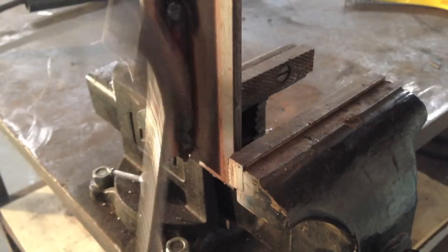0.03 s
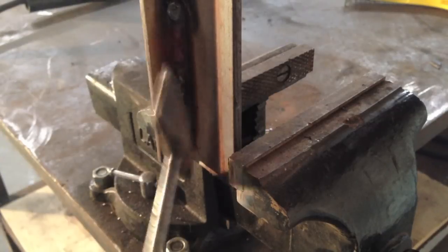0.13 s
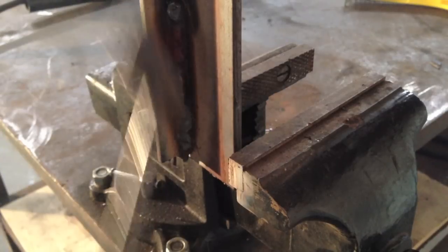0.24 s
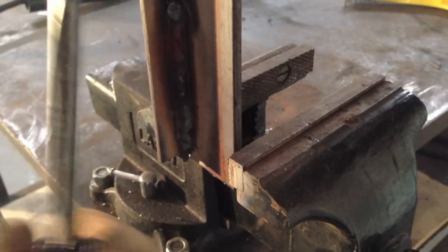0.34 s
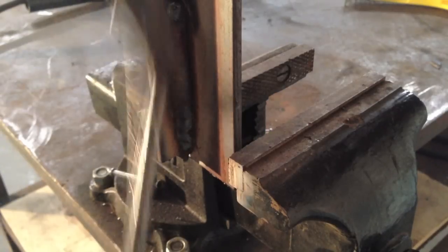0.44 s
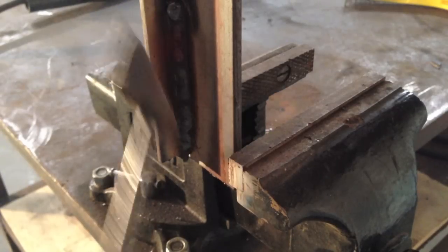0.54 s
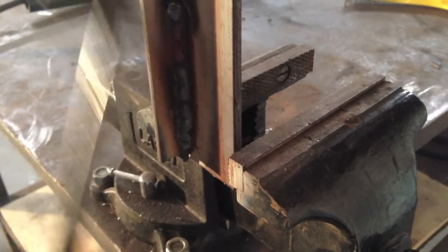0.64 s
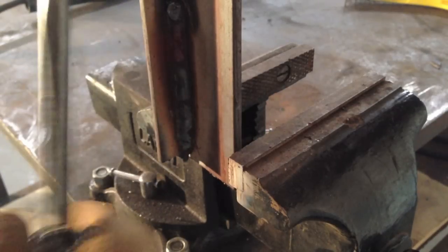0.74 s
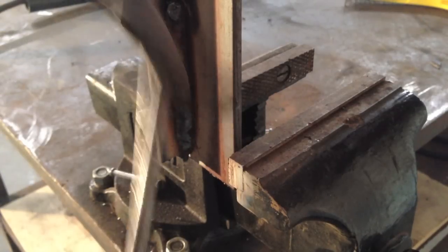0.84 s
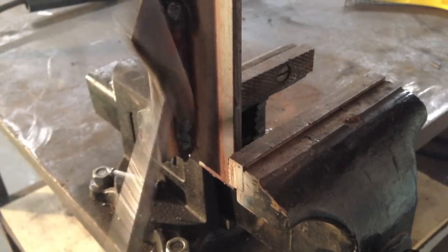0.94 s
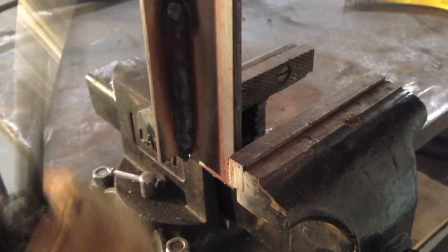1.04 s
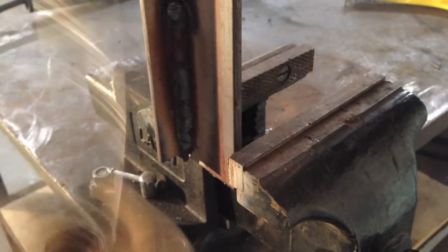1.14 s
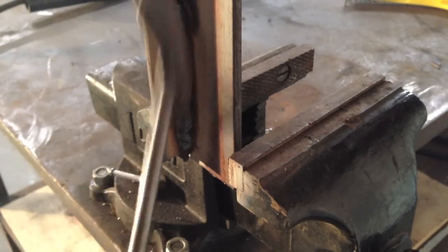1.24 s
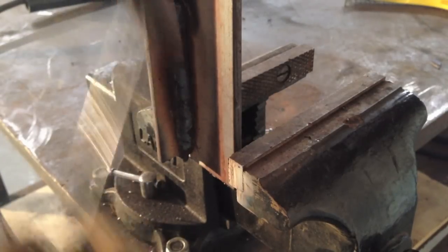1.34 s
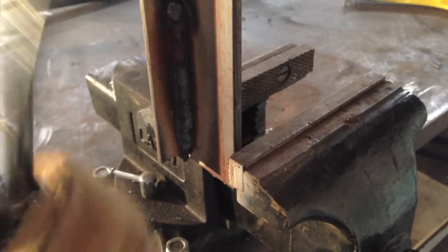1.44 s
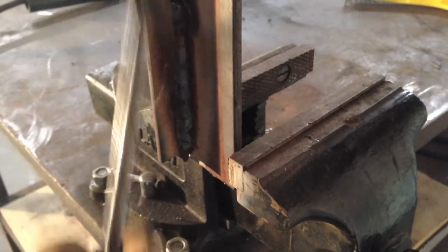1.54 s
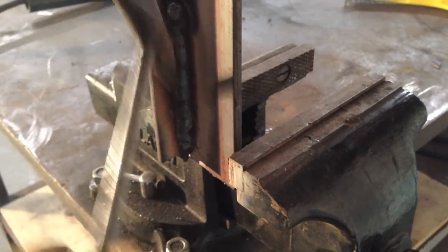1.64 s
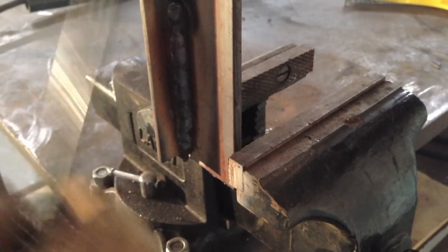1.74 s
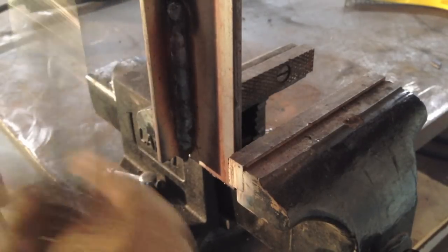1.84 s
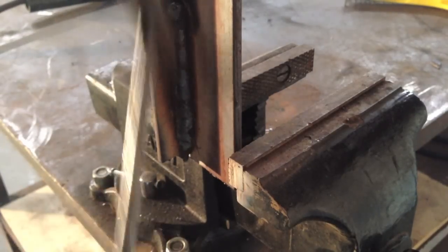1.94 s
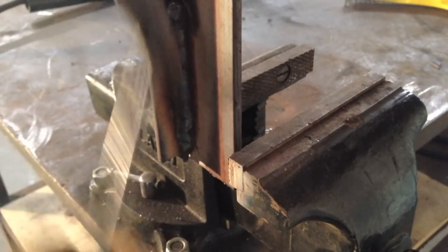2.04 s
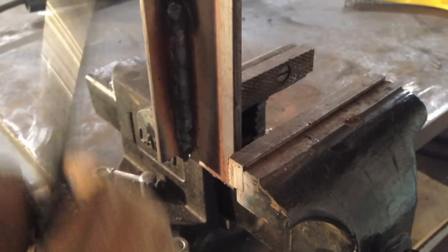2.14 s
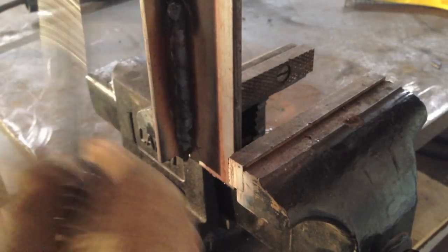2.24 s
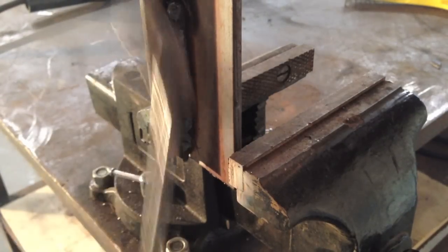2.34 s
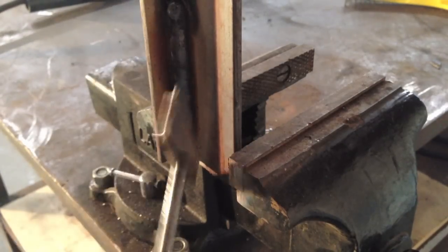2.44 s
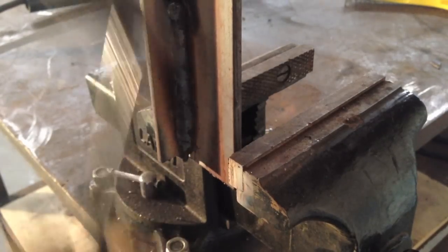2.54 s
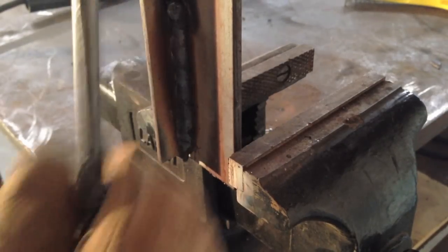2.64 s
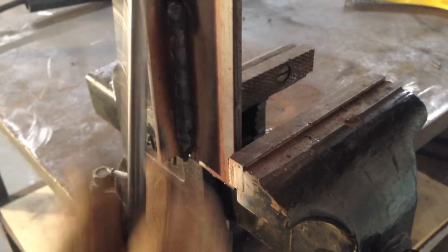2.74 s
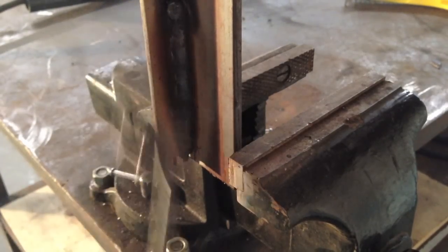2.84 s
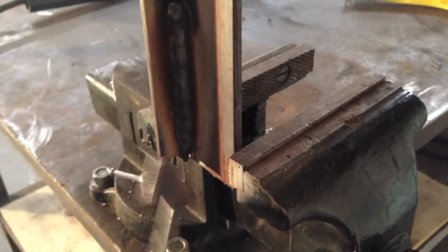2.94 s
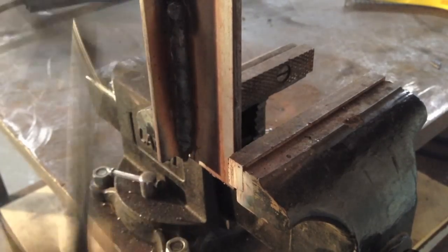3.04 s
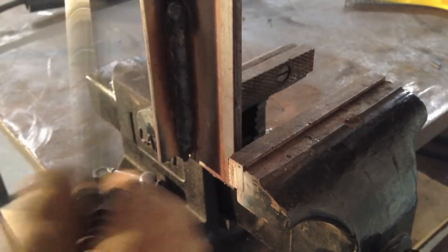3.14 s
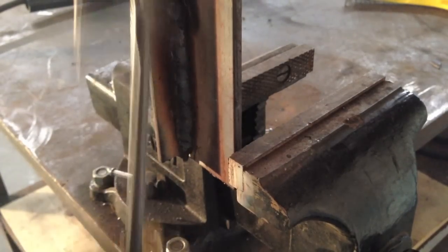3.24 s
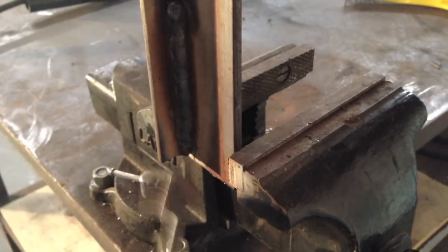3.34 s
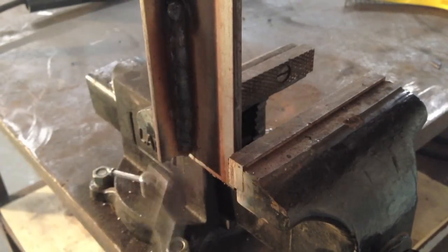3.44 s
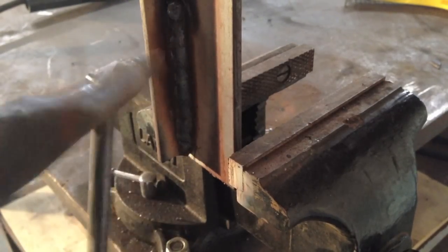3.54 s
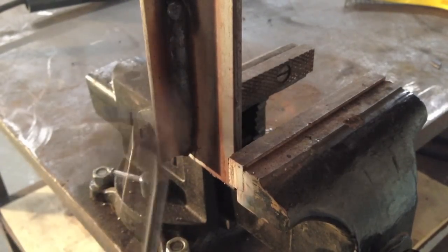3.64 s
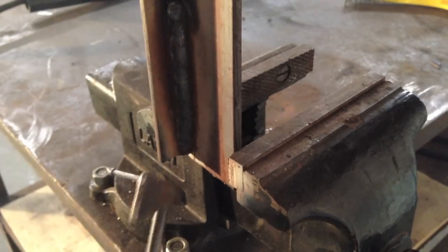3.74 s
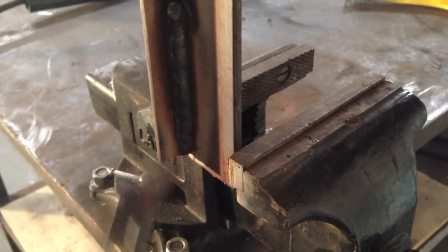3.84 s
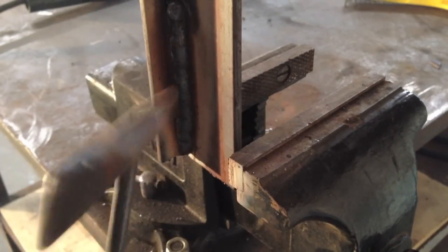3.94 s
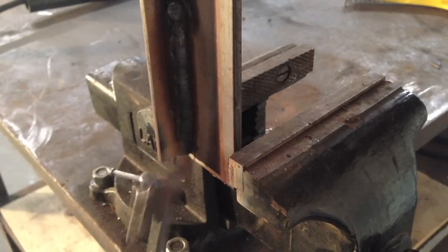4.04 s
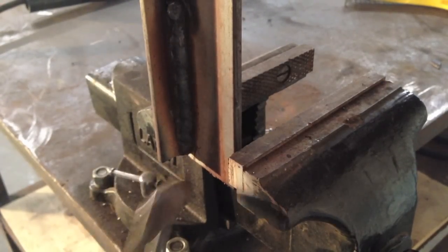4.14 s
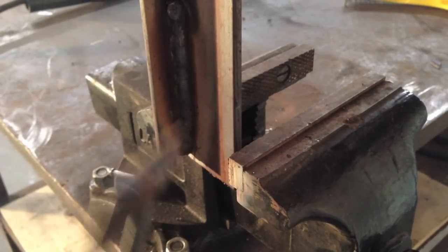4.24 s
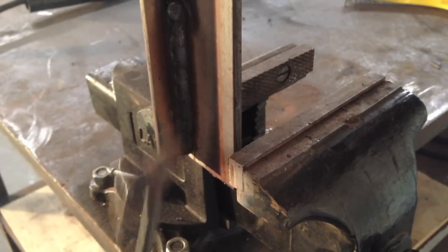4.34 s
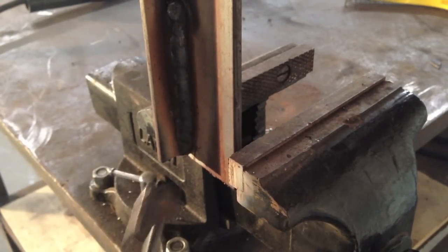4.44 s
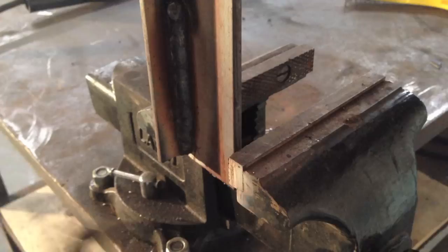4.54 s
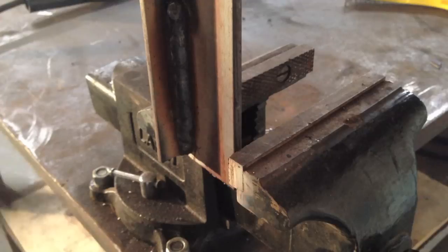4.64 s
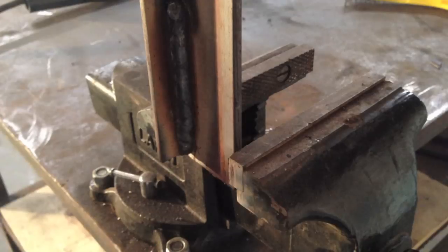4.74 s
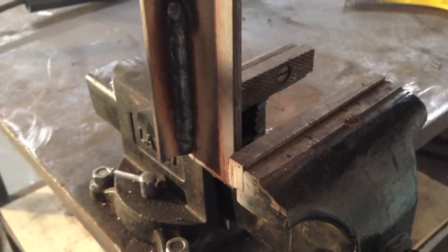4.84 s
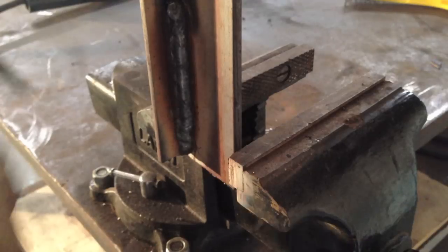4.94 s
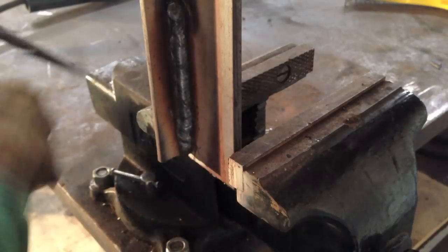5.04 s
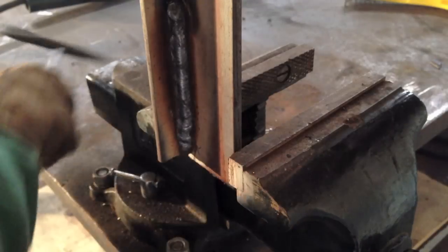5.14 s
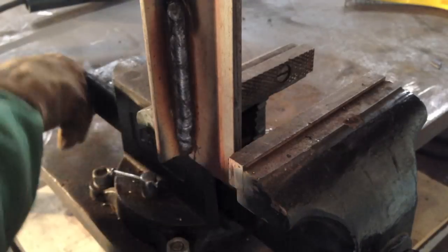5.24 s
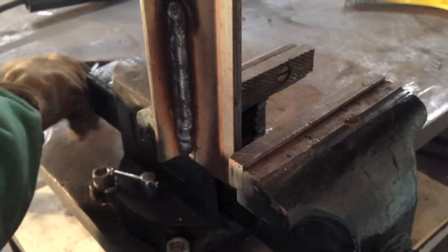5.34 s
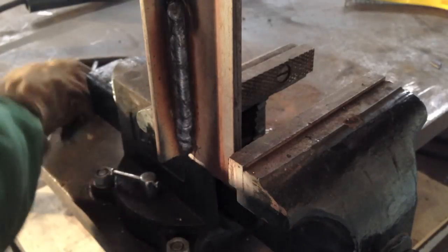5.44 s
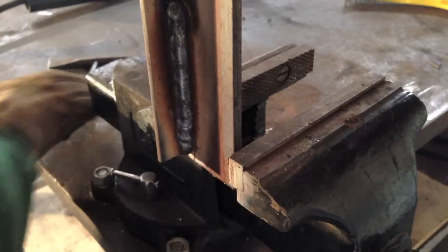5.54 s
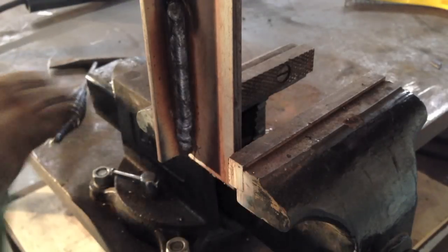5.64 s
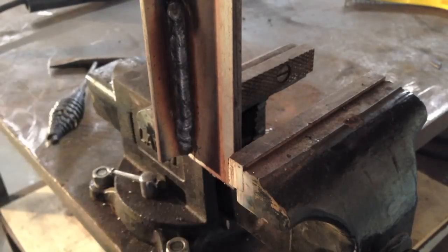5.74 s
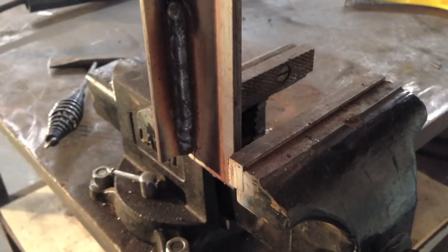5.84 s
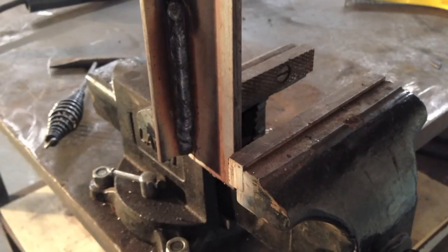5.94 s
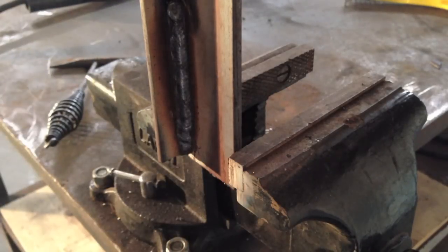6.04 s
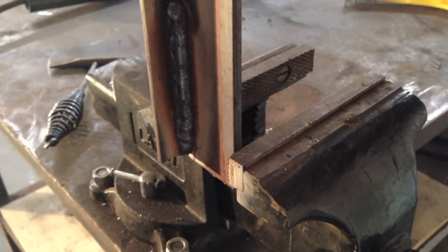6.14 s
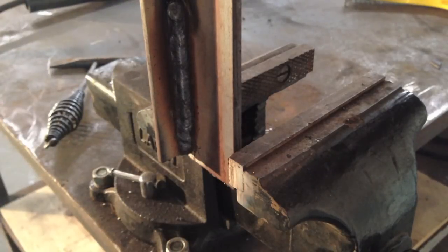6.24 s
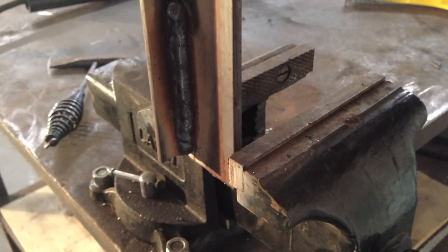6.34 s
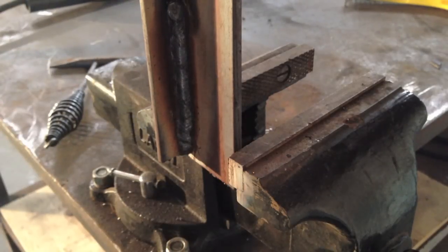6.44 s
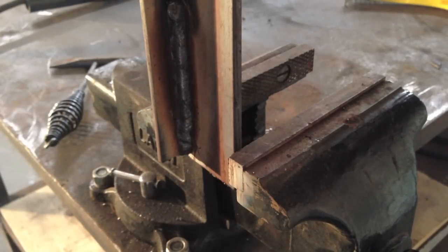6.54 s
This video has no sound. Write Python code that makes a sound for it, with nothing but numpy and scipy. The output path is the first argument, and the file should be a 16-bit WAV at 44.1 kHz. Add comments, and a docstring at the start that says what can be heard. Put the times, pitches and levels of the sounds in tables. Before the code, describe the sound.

Close mono pickup of twelve hard metal-on-metal knocks at a fairly steady, slightly slowing and then quickening pace, some with a thin high squeal at contact. The clamped plate rings brightly over a duller vice thud. Midway the tip starts skipping over the rough weld with gritty ticks. Then a heavy clank as the tool is dropped on the bench, smaller rocking knocks, a springy jingle, and only soft airy ventilation in a lively workshop.

```python
"""Ventilation rushes in a hard-walled workshop while a chipping hammer knocks slag off a weld.
Twelve swings ring a steel plate clamped in a bench vice; some graze before they bite, a few squeal.
From the sixth swing on, the tip also drags and hops over the bead, grit crunches and a chip skitters.
Last, the hammer drops on the steel bench, where its coil handle rocks, rattles and jingles.
Blows are decaying modes, banded noise for crowded modes and echoes, and short noise bursts for contact."""
import sys
import numpy as np
from scipy import signal
from scipy.fft import rfft, irfft, next_fast_len
from scipy.io import wavfile

SR = 44100
rng = np.random.default_rng(int(sys.argv[2]) if len(sys.argv) > 2 else 0)


def unload_audio(sound):
    """Save the sound as a 16-bit wav file, at the path given as the first command line argument."""
    columns = np.transpose(np.atleast_2d(sound))
    # keep every value between -1 and 1, then stretch to whole-number steps
    steps = np.round(np.clip(columns, -1, 1) * 32767)
    wavfile.write(sys.argv[1], SR, steps.astype(np.int16))


N = 291058

# Swings at the weld: [first touch t/s, delay until the bite t/s, knock level/dB, crack level/dB,
# ring brightness level/dB, place (about -1 high on the bead, 1 at its foot), vice and bench thud level/dB]
SWINGS = [(.098, 0.002, -32.5, -21, 1, -0.73, 1), (.479, 0.006, -29.5, -17.5, 2.5, -1.37, 4),
          (0.8544, 0.0051, -27, -13, 3, -1.17, 1), (1.228, 0.0011, -26, -20, -3.5, -1, 5),
          (1.592, 0, -22.5, -17, -3, -0.35, 4.5), (1.951, 0, -27, -22, -7, -0.5, 4),
          (2.317, 0.02, -23, -19, -3, -0.42, -0.5), (2.767, 0.054, -23.5, -21.5, -1.5, -0.27, 1),
          (3.247, .0555, -21.5, -18, 3.5, 0.42, -2.5), (3.7063, 0.0035, -26.5, -21, 2, 0.92, -0.5),
          (4.078, 0.0013, -25, -20, 0.5, 0.93, 0.5), (4.405, 0, -21, -21.5, -2.5, 0.72, -2)]
# Tip drags over the bead: [start t/s, length t/s, ripple to ripple t/s, first knock level/dB,
# first crack level/dB, grit level/dB]
DRAGS = [(1.9883, 0.046, 0.046, -33, -31.5, -45), (2.373, 0.065, 0.03, -22.5, -30.5, -40),
         (2.842, 0.087, 0.034, -24.5, -23.5, -39.5), (3.3216, 0.048, .0305, -19.5, -20.5, -37.5),
         (3.758, .04, 0.029, -32.5, -32.5, -36)]
# Tip squeals on bare steel: [start t/s, length t/s, pitch f/Hz, level/dB, echo level/dB re squeal]
SKIDS = [(0.098, 0.0063, 7930, -11, -19.5), (0.853, 0.0054, 8240, -18, -19),
         (3.246, 0.0061, 8045, -20, -26), (3.3827, 0.00784, 7960, -22, -13),
         (3.383, 0.023, 3776, -33, -4.5)]
# Small ticks, slag flakes and light rebounds of the tip: [t/s, relative level/dB]
SMALL_TICKS = [(.912, -31), (1.1054, -47), (2.239, -43.5), (2.4415, -27.5), (4.428, -20.5)]
# Modes of plate, vice and hammer head: [f/Hz, relative level/dB, decay t60/s,
# level/dB gained per unit of place down the bead]
STEEL_MODES = [(167.4, -23.5, 0.483, -3.5), (294.4, -15, 0.6, 0.5), (366.6, -10, 0.38, 5),
               (619.3, -18.5, 0.36, 6.5), (918, -8.5, 0.41, -4.5), (974, -7.5, 0.42, 0.5),
               (1038, -14, 0.56, -1.5), (1125, -20, 0.56, 6.5), (1497, -10, 0.51, 0), (1544, -13, 0.5, 1),
               (1668, -20, 0.44, 6), (1882, -14, 0.56, 3), (1913, -16, 0.13, 17.5), (2022, -15, .35, 1.5),
               (2190, -18, 0.34, 8.5), (2600, -14, 0.46, -4), (2646, -18.5, 0.13, 7.5),
               (2900, -21, 0.25, 7), (3030, -16, 0.16, 6.5), (3745, -15, 0.23, 1.5), (5080, -24, .28, 4),
               (6030, -25.5, .26, -6), (6350, -28, 0.21, -13), (7100, -18, .25, -4.5),
               (7930, -12, 0.24, -2.5), (8480, -15, .18, -0.5)]
# Brief pings of the head while the tip is pressed on steel: [f/Hz, level/dB re crack, decay t60/s]
HEAD_PING = [(1530, -4.5, .035), (1900, -11.5, .045), (2596, -8, 0.036), (3090, -10, 0.019),
             (3745, -6, .035), (4740, -11, 0.02), (6400, -6.5, 0.019), (8400, -5.5, .04)]
# Hammer landing and rocking on the bench: [t/s, knock level/dB, crack level/dB]
LANDINGS = [(5.3255, -16.5, -13), (5.337, -17, -18), (5.405, -26, -44), (5.490, -28, -40),
            (5.5812, -31.5, -31), (5.6576, -32, -25), (5.7863, -39, -48), (5.8383, -35, -19),
            (5.879, -34.5, -36), (5.9364, -38, -44)]
# Weight rolling onto the handle: [t/s, part (-1 head, 1 handle), thud level/dB]
HAMMER_PART = [(5.36, -0.86, -3.5), (5.49, -0.0023, -0.5), (5.6, 1, 5), (5.85, 0.87, -2)]
# Modes of bench top and coil handle: [f/Hz, relative level/dB, decay t60/s,
# level/dB gained when the handle touches, lost when the head does]
BENCH_MODES = [(205, -12, 0.21, -6.5), (281, -13.5, 0.44, 9), (391.4, -14, 0.7, 7.5), (516, -19, 0.85, 9),
               (668, -18, 0.47, -2), (1056, -19.5, 0.46, -9.5), (1340, -19, 0.49, -7),
               (1410, -13, 0.68, -1), (1610, -13, 0.52, 1), (1840, -10.5, 0.25, 0), (2290, -24, .3, -8),
               (2690, -29, 0.23, 8), (3230, -15, 0.19, 3), (3440, -20, .17, 6), (3720, -17, 0.18, 3),
               (4490, -16, 0.12, 3), (7000, -26, 0.16, 5.5), (7900, -20.5, 0.22, 11)]
# Noise colours of the crowded higher modes and their echoes: [f/Hz, relative density level/dB]
STEEL_WASH = [(40, -39), (100, -24.5), (170, -4.5), (330, 0.5), (500, -0.5), (780, -5.5), (1000, 1),
              (2000, -3), (2500, -9.5), (5500, -16.5), (8200, -14), (9300, -33.5), (12000, -58.5),
              (15000, -42.5)]
BENCH_WASH = [(50, -41), (110, -12.5), (200, -2.5), (400, 6.5), (600, 0.5), (800, -7.5), (1050, 1.5),
              (1500, -2.5), (2500, -10.5), (5500, -14), (8000, -13.5), (9300, -26), (12000, -45),
              (15000, -49)]
# Noise colour of contact cracks, slag grains and small ticks: [f/Hz, relative density level/dB]
CRACK_COLOUR = [(60, -45.5), (200, -25.5), (700, -3.5), (1600, -10.5), (3000, -4.5), (5000, -5.5),
                (6500, -3), (8100, 4.5), (9300, -7), (11000, -21), (15000, -40)]
# Dying of the ring in the workshop: [f/Hz, decay t60/s]
RING_T60 = [(100, .45), (350, 0.46), (700, 0.49), (1200, 0.48), (2000, .55), (3500, 0.44), (6000, 0.292),
            (8500, 0.36), (13000, 0.29)]
# Noise colour of the ventilation: [f/Hz, relative density level/dB]
AIR_COLOUR = [(12, -87), (20, -45), (90, -26.5), (109, -15.5), (202, -3), (306, -12), (342, -4), (427, -7),
              (881, -26.5), (985, -15), (1100, -21.5), (1540, -20.5), (2330, -35.5), (7730, -42.5),
              (15500, -48)]
# Level of the ventilation noise, dipping early and then recovering: [t/s, rms level/dB]
AIR_LEVEL = [(0, -44), (.4, -51), (2.2, -46), (3.6, -47), (6.6, -46)]

# a graze is weaker than the bite, and duller the earlier it comes
GRAZE_DB, GRAZE_DULLING_DB_PER_S = -1.5, 134
# a long approach skips once more, at this share of the delay
LONG_APPROACH_S, SKIP_SHARE = .015, .42
# loss from hop to hop along a drag; brightness added to (crack minus knock)
HOP_KNOCK_LOSS_DB, HOP_CRACK_LOSS_DB, HOP_BRIGHT_DB = 4, 17, -1.5
# the plate's long note; the swell then stretches this decay
PLATE_HZ, PLATE_T60, PLATE_SWELL_S = 1229, 0.47, 0.07
# the note's level re knock; it has a node high on the bead (place, width)
NOTE_DB, NOTE_NODE, NODE_WIDTH = 4, -1.07, 0.57
# skittering chip: level of each partial before random spread, loss per bounce, pitch range
CHIP_S, CHIP_DB, CHIP_BOUNCE_S, CHIP_LOSS_DB = 2.028, -53, .021, 2
CHIP_LOW_HZ, CHIP_HIGH_HZ = 2000, 4400
# ring brightness when the head or the coil handle touches the bench
HEAD_BRIGHT_DB, HANDLE_BRIGHT_DB = 0.5, 0.5
# jingles of the loose coil between the knocks, dying down
JINGLE_START_S, JINGLE_S, JINGLES_PER_S = 5.59, .5, 25
JINGLE_DB, JINGLE_FADE_DB_PER_S = -43.5, 7
# coil turns: level of each partial re knock before random spread, pitch range, decay
COIL_DB, COIL_LOW_HZ, COIL_HIGH_HZ, COIL_T60 = -19, 1300, 10500, .2
CUTOFF_HZ = 15700
TAIL = np.arange(int(.8 * SR)) / SR  # the time axis of one decay, s


def chipping():
    """The hammer at work on the clamped plate: ring, contact, squeals and slag."""
    contacts, strokes = weld_contacts(), aim()
    body = wash(contacts, strokes, STEEL_WASH, level_db=-2.7,
                rise_cycles=2.7, smear_s=0.0017, early_db=3.0, early_t60=0.13)
    modes = ringing(contacts, strokes, STEEL_MODES, level_db=2.2, scatter=.006, uneven_db=3.0,
                    rise_cycles=7.1, flutter_hz=17.4, direct_t60=0.28)
    contact = cracks(contacts, t60=0.018, rise_s=0.00061) + pings(contacts)
    return body + modes + contact + plate_note() + skids() + grit_and_ticks() + chip()


def weld_contacts():
    """Swings graze and bite, drags hop down the bead: rows of (s, knock dB, crack dB, brightness dB)."""
    rows = []
    for s, delay, knock_db, crack_db, bright_db, *_ in SWINGS:
        rows.append((s + delay, knock_db, crack_db, bright_db))
        grazes = []
        if delay > 0:
            grazes.append(0)
        if delay > LONG_APPROACH_S:
            grazes.append(SKIP_SHARE * delay)
        for after in grazes:
            dull_db = GRAZE_DULLING_DB_PER_S * (delay - after)
            graze_crack_db = crack_db + GRAZE_DB - dull_db
            rows.append((s + after, knock_db + GRAZE_DB, graze_crack_db, bright_db - dull_db))
    for s, length, hop_s, knock_db, crack_db, _ in DRAGS:
        bright_db = HOP_BRIGHT_DB + crack_db - knock_db
        for k, after in enumerate(np.arange(0, length, hop_s)):
            hop_knock_db = knock_db - k * HOP_KNOCK_LOSS_DB
            hop_crack_db = crack_db - k * HOP_CRACK_LOSS_DB
            rows.append((s + after, hop_knock_db, hop_crack_db, bright_db))
    return rows


def aim():
    """Where the swings land and how hard they shake the vice: rows of (s, place, thud dB)."""
    return [(s + delay, place, thud_db) for s, delay, *_, place, thud_db in SWINGS]


def pings(contacts, level_db=1, uneven_db=3, scatter=.011, rise_cycles=1.5):
    """Every contact sets the hammer head ringing for an instant, each mode with a strength of its own."""
    out = np.zeros(N)
    for s, _, crack_db, _ in contacts:
        chances = rng.uniform(-1, 1, (len(HEAD_PING), 2))
        for (hz, db, t60), (strength, detune) in zip(HEAD_PING, chances):
            t = TAIL[TAIL < t60]
            shape = dying(t60)[:len(t)] * (1 - np.exp(-t * hz / rise_cycles))
            tone = np.sin(2 * np.pi * hz * (1 + scatter * detune) * t) * shape
            gain = from_db(level_db + crack_db + db + uneven_db * strength)
            add(out, s, rng.choice([-1, 1]) * gain * tone)
    return without_bass(out)


def plate_note(struck=0.24):
    """The plate's long note starts with the bite and swells; a blow near its node barely wakes it."""
    out = np.zeros(N)
    swell = struck + 1 - np.exp(-TAIL / PLATE_SWELL_S)
    shape = swell * dying(PLATE_T60) * (1 + TAIL / PLATE_SWELL_S) / 2
    note = shape * np.sin(2 * np.pi * PLATE_HZ * TAIL)
    for s, delay, knock_db, _, _, place, _ in SWINGS:
        reach = np.tanh((place - NOTE_NODE) / NODE_WIDTH)  # changes sign across the node
        add(out, s + delay, from_db(knock_db + NOTE_DB) * reach * note)
    return out


def skids(edge_s=0.00085, echo_t60=0.3, spread=.008):
    """Stick and slip drive one mode of the head as the tip slides; narrow noise is the room's echo."""
    out = np.zeros(N)
    for s, length, hz, db, echo_db in SKIDS:
        held = np.clip(np.minimum(TAIL, length - TAIL) / edge_s, 0, 1)
        squeal = np.sqrt(2) * held * np.sin(2 * np.pi * hz * TAIL)
        around = signal.butter(2, [hz * (1 - spread), hz * (1 + spread)], "band", fs=SR, output="sos")
        echo = signal.sosfilt(around, rng.standard_normal(len(TAIL)))
        echo = from_db(echo_db) * dying(echo_t60) * echo / echo.std()
        add(out, s, from_db(db) * (squeal + echo))
    return out


def grit_and_ticks(grains_per_s=250, uneven_db=4, grain_t60=0.023, echo_db=-22, echo_t60=0.23,
                   low_hz=1500, high_hz=9500):
    """Slag breaks in random grains under the dragged tip, among small ticks: noise in decaying bursts."""
    energy = np.zeros(N)
    for s, length, *_, db in DRAGS:
        chance, sizes = rng.random(len(TAIL)), rng.standard_normal(len(TAIL))
        breaks = (chance < grains_per_s / SR) * (TAIL < length)
        add(energy, s, breaks * from_db(db + uneven_db * sizes) ** 2)
    for s, db in SMALL_TICKS:
        add(energy, s, from_db([db]) ** 2)
    grain = dying(grain_t60) + from_db(echo_db) * dying(echo_t60)
    envelope = np.sqrt(np.abs(signal.fftconvolve(energy, grain ** 2)[:N]))
    band = signal.butter(3, [low_hz, high_hz], "band", fs=SR, output="sos")
    return signal.sosfilt(band, envelope * noise(CRACK_COLOUR))


def chip(count=5):
    """A large chip of slag bounces over the vice, more faintly each time."""
    bounces = [(CHIP_S + k * CHIP_BOUNCE_S, CHIP_DB - k * CHIP_LOSS_DB) for k in range(count)]
    return tinkle(bounces, CHIP_LOW_HZ, CHIP_HIGH_HZ, t60=.2, count=18)


def dropped_hammer():
    """The head slams on the bench top, then the coil handle rattles."""
    contacts = bench_contacts()
    body = wash(contacts, HAMMER_PART, BENCH_WASH, level_db=-0.5,
                rise_cycles=0.99, smear_s=0.0026, early_db=6.5, early_t60=0.046)
    modes = ringing(contacts, HAMMER_PART, BENCH_MODES, level_db=1.5, scatter=0.0252, uneven_db=5.5,
                    rise_cycles=0.82, flutter_hz=22.0, direct_t60=0.23)
    contact = from_db(-15) * cracks(contacts, t60=0.061, rise_s=0.0011)
    return body + modes + coil(contacts) + contact


def bench_contacts():
    """Rocking knocks and faint, uneven coil jingles: rows of (s, knock dB, crack dB, brightness dB)."""
    count = int(JINGLE_S * JINGLES_PER_S)
    after = (np.arange(count) + rng.random(count)) / JINGLES_PER_S
    jingle_db = JINGLE_DB - JINGLE_FADE_DB_PER_S * after
    jingles = np.column_stack([JINGLE_START_S + after, jingle_db, jingle_db])
    s, knock_db, crack_db = np.vstack([LANDINGS, jingles]).T
    part = in_time(HAMMER_PART, s)[0]
    bright_db = np.interp(part, [-1, 1], [HEAD_BRIGHT_DB, HANDLE_BRIGHT_DB])
    return np.column_stack([s, knock_db, crack_db, bright_db])


def coil(contacts):
    """The turns of the handle ping anew at every touch once the weight lies on it."""
    touches = []
    for s, knock_db, *_ in contacts:
        if in_time(HAMMER_PART, s)[0] > 0:
            touches.append((s, knock_db + COIL_DB))
    return tinkle(touches, COIL_LOW_HZ, COIL_HIGH_HZ, COIL_T60, count=20)


def wash(contacts, strokes, spectrum, level_db, rise_cycles, smear_s, early_db, early_t60):
    """Countless modes and echoes merge into a noise tail; lows build up later, early treble is stronger."""
    out = np.zeros(N)
    times, knock_db, _, bright_db = np.transpose(contacts)
    thud_db = in_time(strokes, times)[1]
    for hz, band in noise_bands(spectrum):
        rise = 1 - np.exp(-TAIL / (rise_cycles / hz + smear_s))
        early = 1 + from_db(early_db) * hardness(hz) * dying(early_t60)
        shape = dying(at_hz(RING_T60, hz)) * rise * early
        levels = level_db + knock_db + bright_db * hardness(hz) + thud_db * heaviness(hz)
        energy = np.zeros(N)  # overlapping tails add in power
        for s, db in zip(times, levels):
            add(energy, s, (from_db(db) * shape) ** 2)
        out += np.sqrt(energy) * band[:N]
    return out


def ringing(contacts, strokes, modes, level_db, scatter, uneven_db, rise_cycles, flutter_hz, direct_t60):
    """Contacts ring the modes their place favours; echoes replace the direct tone and make it flutter."""
    out, t = np.zeros(N), TAIL.astype(np.float32)
    times, knock_db, _, bright_db = np.transpose(contacts)
    place, thud_db = in_time(strokes, times)[:2]
    lowpass = signal.butter(2, flutter_hz, fs=SR, output="sos")
    slow = signal.sosfilt(lowpass, rng.standard_normal((2, 2 * N)))
    echoes = (slow / slow.std() / np.sqrt(2)).astype(np.float32)
    direct = dying(direct_t60).astype(np.float32)
    reflected = np.sqrt(1 - direct ** 2)
    for hz, mode_db, t60, place_db in modes:
        shape = (dying(t60) * (1 - np.exp(-TAIL * hz / rise_cycles))).astype(np.float32)
        blow_db = knock_db + bright_db * hardness(hz) + thud_db * heaviness(hz)
        levels = level_db + mode_db + blow_db + place_db * place
        chances = rng.uniform(-1, 1, (len(times), 4))
        for s, db, (detune, strength, turn, path) in zip(times, levels, chances):
            start = int(abs(path) * N)  # a chance stretch of the slow flutter
            in_step, across = echoes[:, start:start + len(t)] * reflected
            phase = np.float32(2 * np.pi * hz * (1 + scatter * detune)) * t + np.float32(np.pi * turn)
            tone = (direct + in_step) * np.sin(phase) + across * np.cos(phase)
            add(out, s, np.float32(from_db(db + uneven_db * strength)) * shape * tone)
    return out


def cracks(contacts, t60, rise_s):
    """The direct sound of each contact is a short burst of coloured noise."""
    out = np.zeros(N)
    shape = dying(t60) * (1 - np.exp(-TAIL / rise_s))
    for s, _, crack_db, _ in contacts:
        add(out, s, from_db(crack_db) * shape * noise(CRACK_COLOUR, size=len(TAIL)))
    return 2 * out


def tinkle(touches, low_hz, high_hz, t60, count, uneven_db=4):
    """A small loose piece rings chance pitches at each touch (s, dB), mostly in mid-range."""
    out, t = np.zeros(N), TAIL[TAIL < t60]
    for s, db in touches:
        # the mean of two draws favours the middle
        hz = low_hz * (high_hz / low_hz) ** rng.random((count, 2)).mean(axis=1, keepdims=True)
        gains = from_db(db + uneven_db * rng.standard_normal(count))
        strength = gains * rng.choice([-1, 1], count)
        add(out, s, strength @ np.sin(2 * np.pi * hz * t) * dying(t60)[:len(t)])
    return without_bass(out)


def without_bass(x, low_hz=600):
    """Take the bass out: the pings and tinkles keep only their higher tones."""
    highpass = signal.butter(2, low_hz, "high", fs=SR, output="sos")
    return signal.sosfilt(highpass, x + 1e-18)  # the tiny offset avoids denormals


def hardness(hz, soft_hz=1300, hard_hz=7000):
    """Share of a blow's brightness at this pitch: contact hardness acts towards the treble."""
    return at_hz([(soft_hz, 0), (hard_hz, 1)], hz)


def heaviness(hz, low_hz=280, high_hz=700):
    """Share of a blow's thud at this pitch: weight behind the hammer acts towards the bass."""
    return at_hz([(low_hz, 1), (high_hz, 0)], hz)


def ventilation():
    """Air rushes through the workshop as coloured noise whose level dips early and then recovers."""
    level_db, = in_time(AIR_LEVEL, np.arange(N) / SR)
    return from_db(level_db) * noise(AIR_COLOUR)


def noise(spectrum, size=N):
    """Noise of a given colour, rms 1."""
    length = next_fast_len(size)
    bins = rfft(rng.standard_normal(length))
    hz = np.arange(len(bins)) * SR / length
    x = irfft(bins * from_db(at_hz(spectrum, hz)), length)[:size]
    return x / x.std()


def noise_bands(spectrum, count=22):
    """Coloured noise split into log-spaced bands: (centre Hz, band)."""
    length = next_fast_len(N + len(TAIL), True)
    bins = rfft(noise(spectrum, size=length))
    hz = np.arange(len(bins)) * SR / length
    edges = np.geomspace(40, CUTOFF_HZ, count + 1)
    bands = []
    for lo, hi in zip(edges, edges[1:]):
        inside = (hz >= lo) & (hz < hi)
        bands.append((np.sqrt(lo * hi), irfft(bins * inside, length)))
    return bands


def from_db(db):
    """Decibels to gain."""
    return 10 ** (np.asarray(db) / 20)


def at_hz(points, hz):
    """Read a table on a log-frequency axis."""
    knots, values = np.transpose(points)
    return np.interp(np.log(np.maximum(hz, 1)), np.log(knots), values)


def in_time(rows, s):
    """The columns of a table at time s."""
    times, *columns = np.transpose(rows)
    return [np.interp(s, times, column) for column in columns]


def dying(t60):
    """Exponential decay by 60 dB in t60 seconds, over one tail."""
    return np.exp(-np.log(1000) * TAIL / t60)


def add(track, s, sound):
    """Mix a sound in at time s."""
    start = max(int(round(s * SR)), 0)
    track[start:start + len(sound)] += sound[:N - start]


def scene():
    """Hammer work, dropped hammer and ventilation summed to one channel."""
    return (chipping() + dropped_hammer() + ventilation())[None]


def record(dry, top=.85):
    """The recorder rounds the highest peaks and cuts the top treble."""
    rounded = dry / (1 + (dry / top) ** 4) ** (1 / 4)
    lowpass = signal.ellip(10, .2, 80, CUTOFF_HZ, fs=SR, output="sos")
    return signal.sosfilt(lowpass, rounded)


dry = scene()
out = record(dry)
unload_audio(out)
```